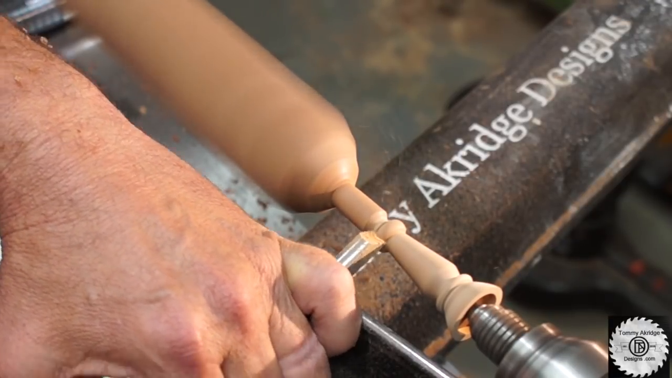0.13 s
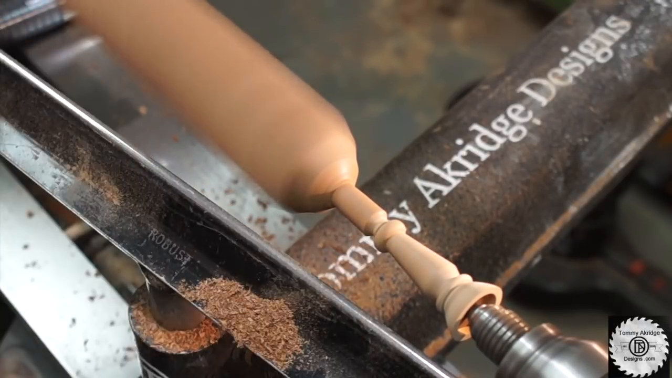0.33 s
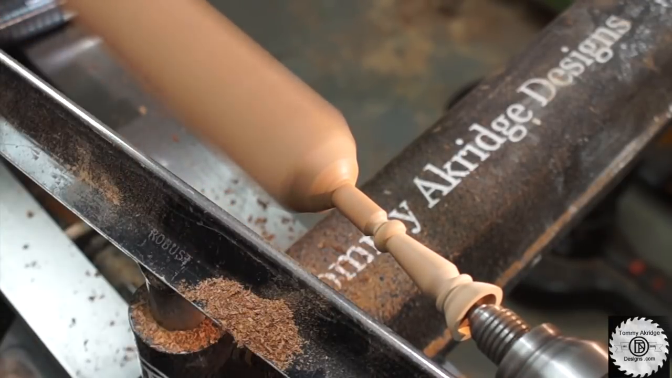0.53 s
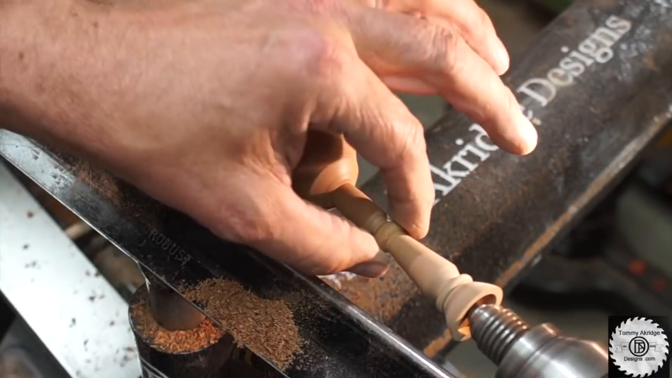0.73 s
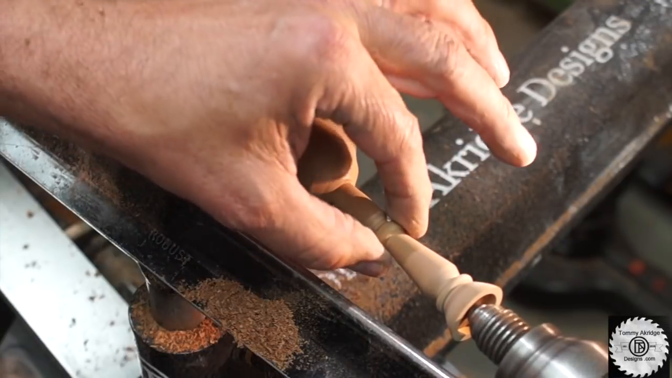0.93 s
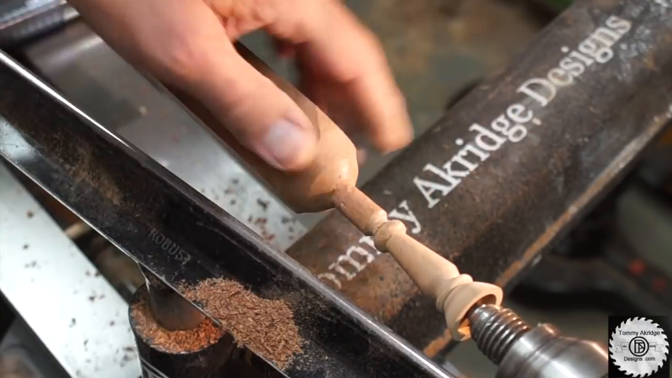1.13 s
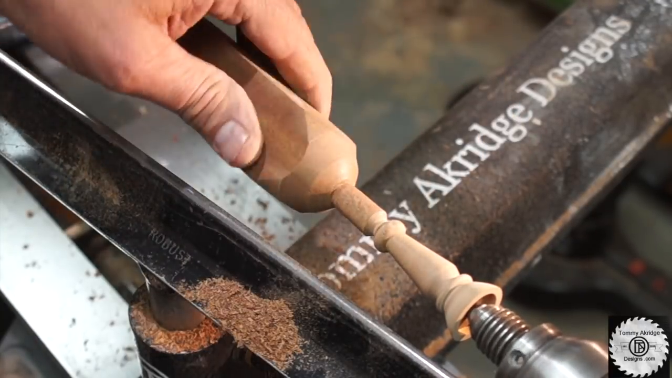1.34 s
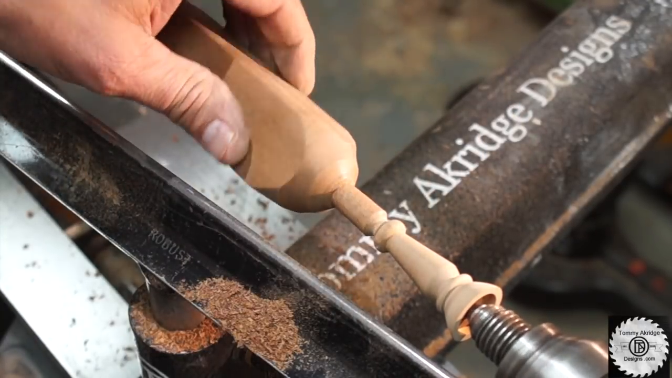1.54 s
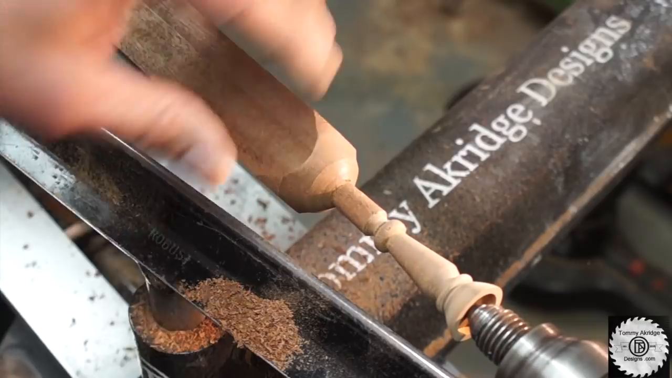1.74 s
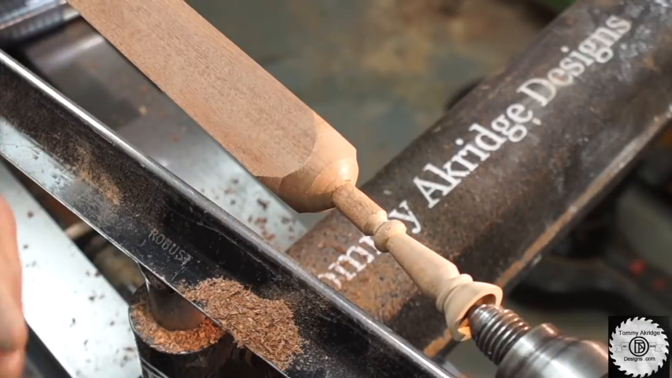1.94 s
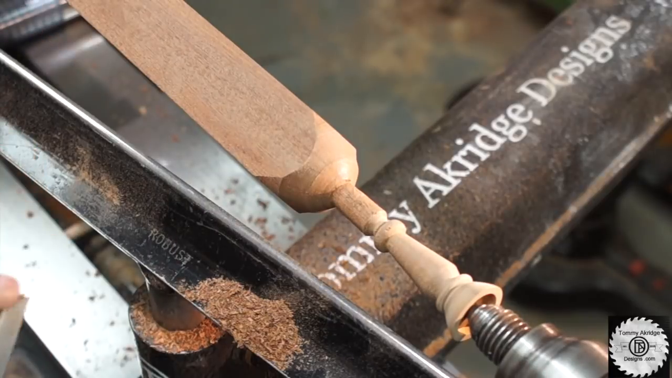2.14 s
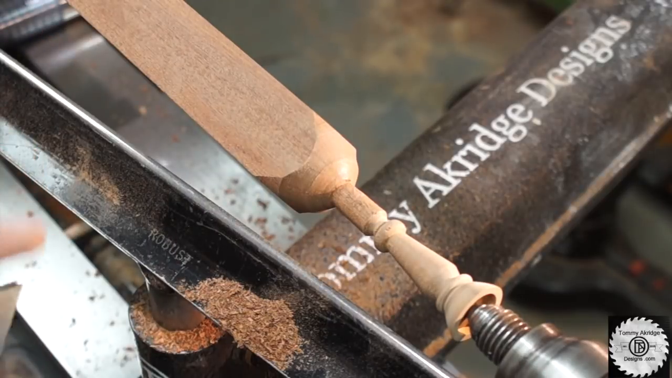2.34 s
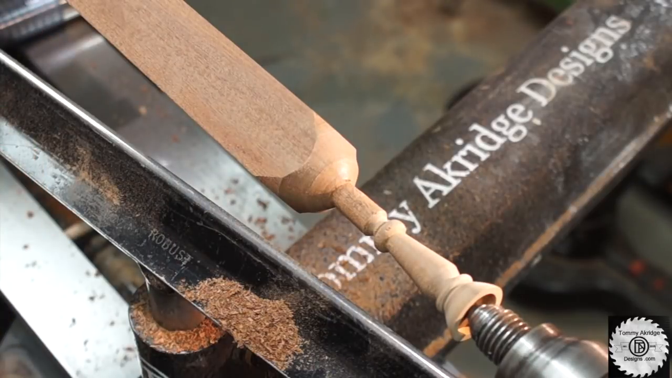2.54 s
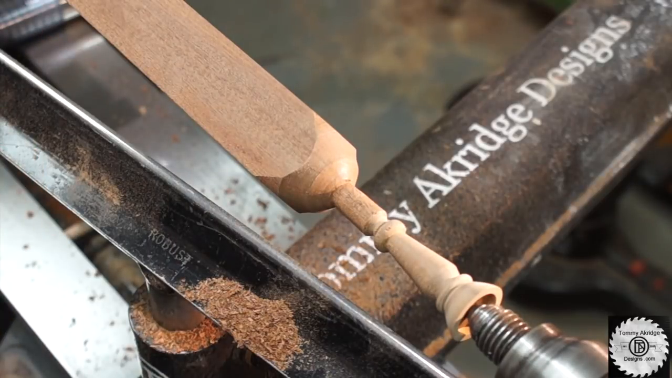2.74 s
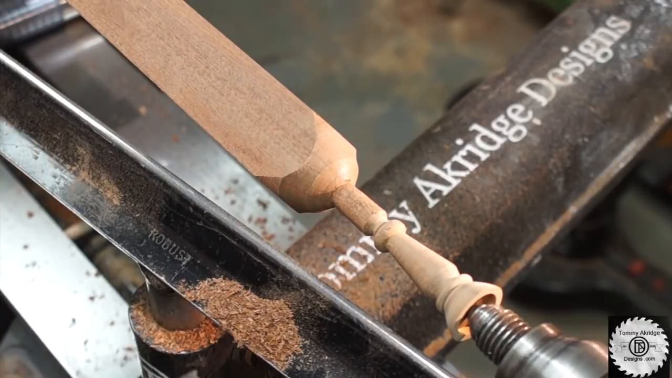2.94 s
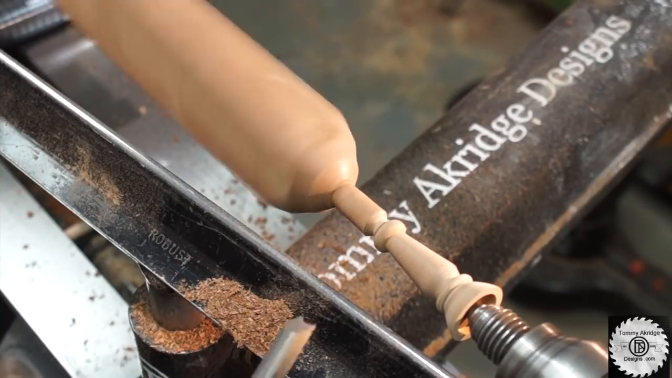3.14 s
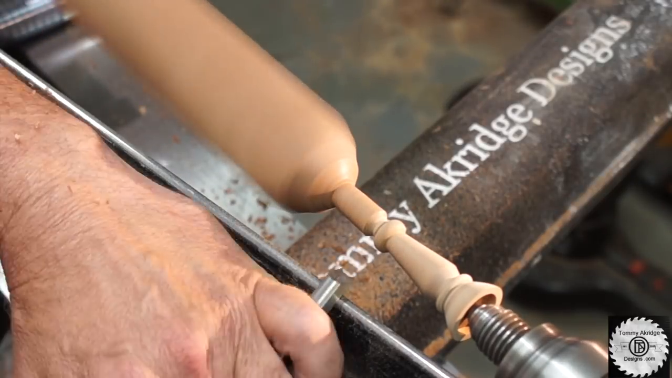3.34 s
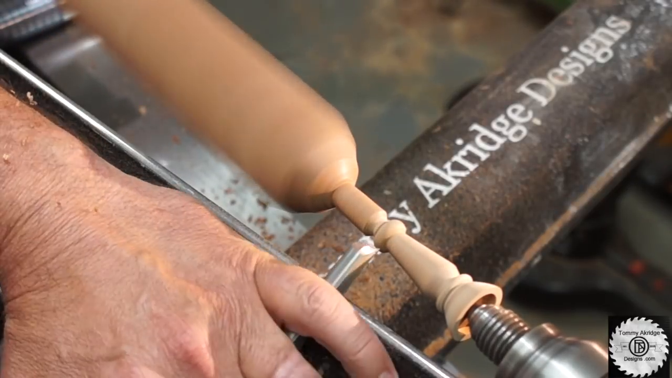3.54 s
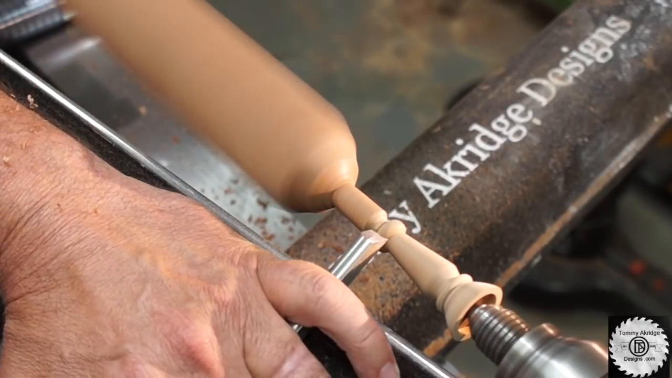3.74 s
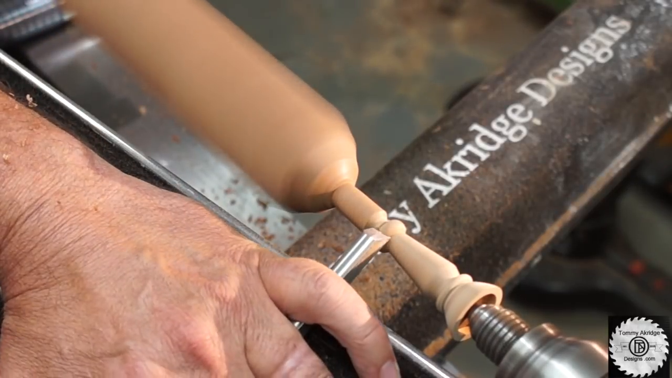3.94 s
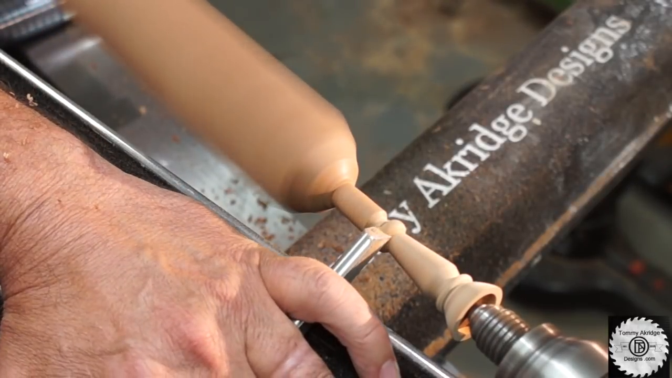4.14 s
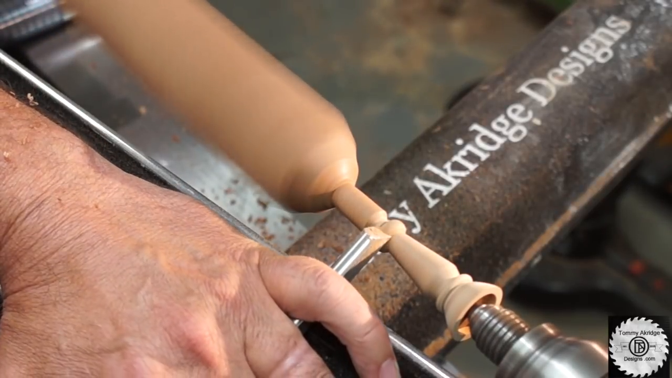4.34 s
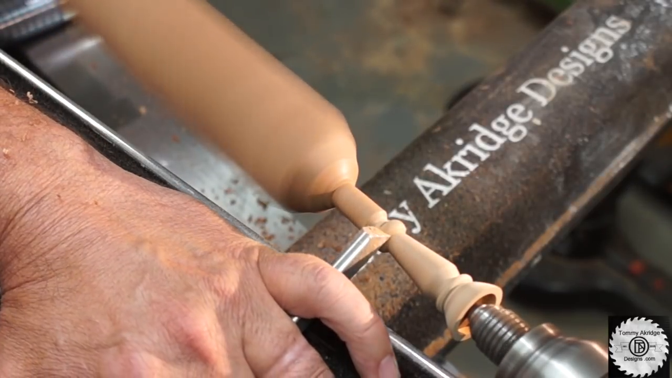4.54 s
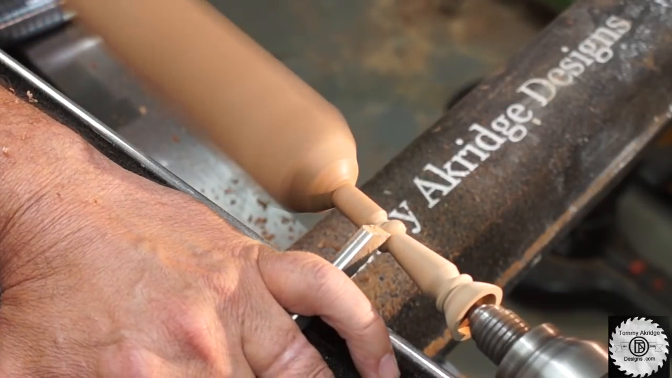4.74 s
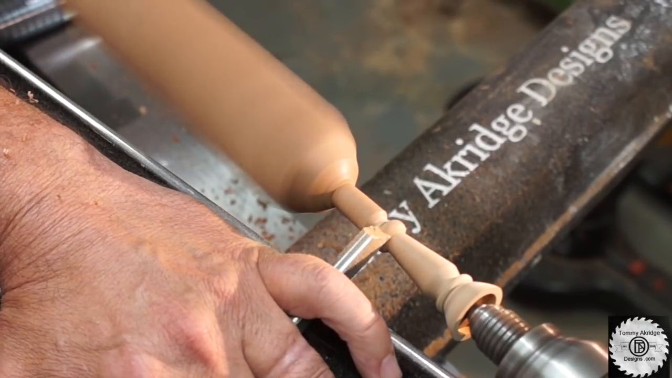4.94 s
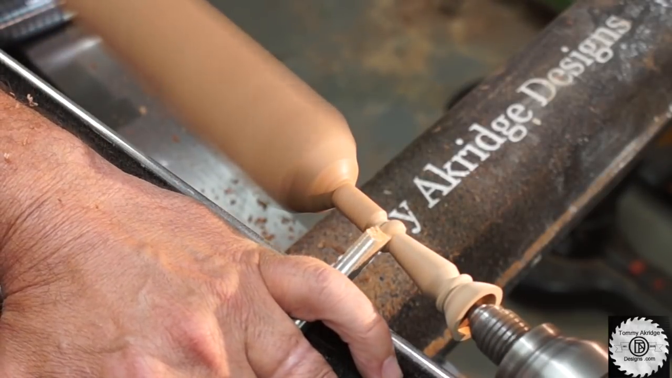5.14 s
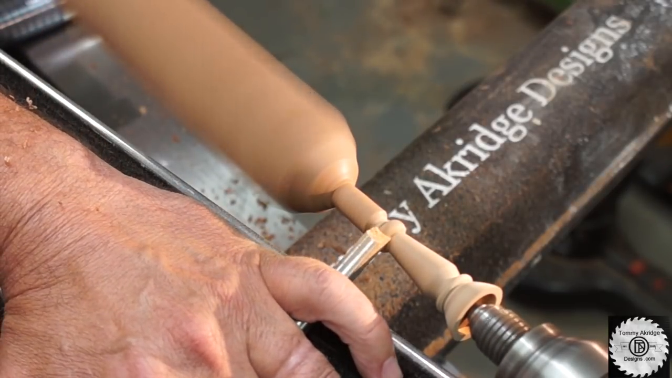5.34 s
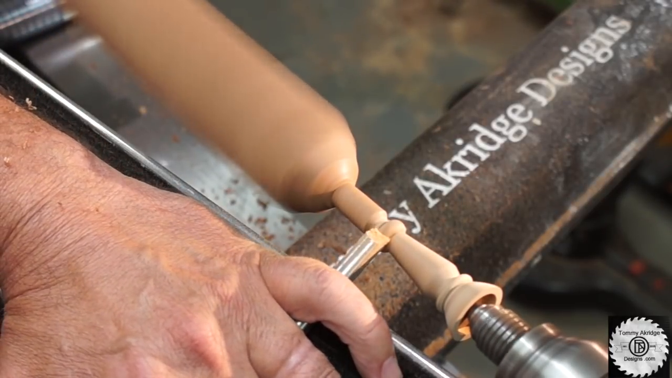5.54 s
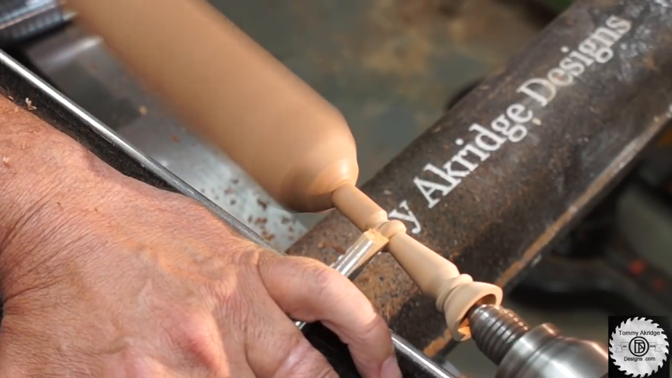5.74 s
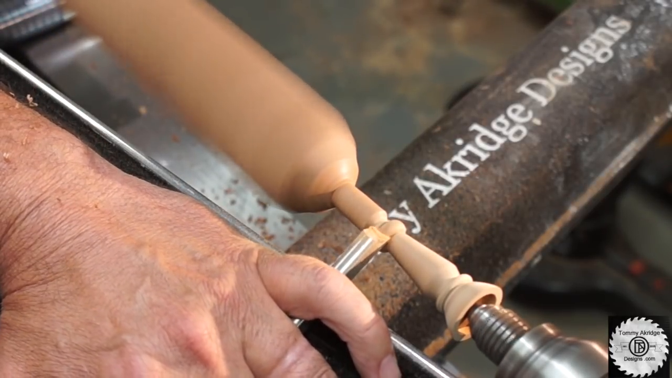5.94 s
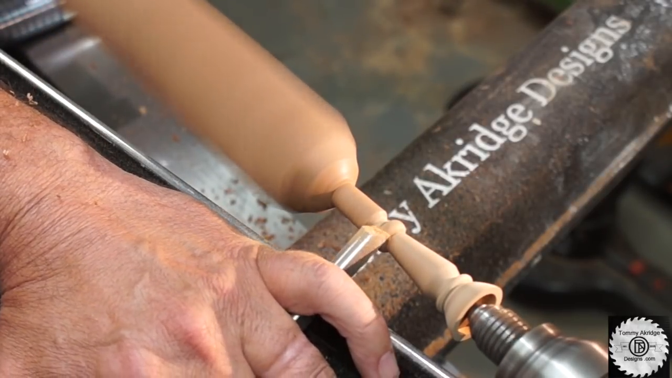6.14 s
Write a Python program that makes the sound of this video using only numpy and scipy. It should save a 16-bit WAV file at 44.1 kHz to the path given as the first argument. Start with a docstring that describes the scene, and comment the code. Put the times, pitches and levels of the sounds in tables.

```python
"""Small wood lathe, close up

A gouge finishes a cut, the spindle brakes to rest while the drive and its fan whine on, then it spins
up again; the gouge clacks onto the tool rest and cuts once more. Tones locked to the rotation make the
motor and bearings; coloured noise that partly repeats as the same marks come by makes the wood chatter
and the steel scrape; brighter noise makes the shavings hiss, and tones at multiples of the rate of the
marks make the cut sing."""
import sys
import numpy as np
from scipy import signal
from scipy.fft import rfft, irfft
from scipy.io import wavfile
from scipy.ndimage import uniform_filter1d, map_coordinates

SR = 44100
rng = np.random.default_rng(int(sys.argv[2]) if len(sys.argv) > 2 else 0)


def store_pcm(level_fs):
    """Save levels as 16-bit WAV."""
    pcm = np.round(np.clip(level_fs, -1, 1) * 32767).astype(np.int16)
    wavfile.write(sys.argv[1], SR, np.atleast_2d(pcm).T)


N = 272538
T = np.arange(N) / SR
FREQS = np.maximum(np.fft.rfftfreq(N, 1 / SR), 1)  # Hz, kept above zero for the logarithm

# Table levels are relative: each source trims its own mix.
# spindle speed (time [s], share of full speed [1])
SPINDLE_SPEED = [(0, 1), (.455, 1), (.565, .825), (.63, .77), (1.12, 0), (3.13, 0), (3.665, .82), (3.76, 1),
                 (6.2, 1)]
# tones of the drive and its fan (frequency [Hz], level [dB], relative flutter [dB])
DRIVE_TONES = [(69.6, -81, -3), (235, -68, 2.5), (364, -57, 0), (479.7, -43, 1.24), (707, -62, 3.5),
               (938.5, -56.5, 5.5), (961.6, -56, 5.5), (1172, -59, 3), (1902, -48, 1.5), (2017, -56, 7),
               (2240, -62.5, 10.5), (2334, -59, 2.5), (4980, -62, 5), (5150, -60, -0.5), (5391, -72, 4),
               (5610, -59.5, -0.5), (5890, -61, -1.5), (6080, -63.5, -5)]
# slow swell of those tones, heard relative to its median (time [s], level [dB])
DRIVE_SWELL = [(0.0, -48.5), (0.08, -46), (1.05, -42.5), (3.67, -42), (5.51, -43), (5.78, -47), (6.18, -46)]
# rush of the fan (frequency [Hz], level [dB])
FAN_SPECTRUM = [(30, -34), (70, -22.5), (200, -18), (310, -11), (420, -1.5), (550, -13), (800, -10.5),
                (1250, 4), (1600, 1), (2200, 2), (2700, -3.5), (5500, -6.5), (9000, -13), (16000, -17.5)]
# its resonances (frequency [Hz], width [Hz], height above the spectrum [dB])
FAN_RESONANCES = [(602, 26, 17), (724, 60, 14), (970, 13, 4), (1884, 83, 4.5), (3350, 550, 5.5),
                  (10230, 460, 8.5)]
# motor tones (frequency at full speed [Hz], level [dB])
MOTOR_TONES = [(126, -48), (1233, -52), (1459, -51), (1497, -48.5), (1943, -51.5), (2430, -52.5)]
# motor housing (frequency [Hz], level [dB])
HOUSING_SPECTRUM = [(60, -55), (130, -24.5), (700, -27), (1000, -17), (1300, -3), (2000, 0), (2500, -2)]
# its resonances (frequency [Hz], width [Hz], height above the spectrum [dB])
HOUSING_RESONANCES = [(1202, 40, 14), (1492, 98, 9), (2050, 130, 0)]
# bearing tones after the headstock (frequency at full speed [Hz], level [dB])
BEARING_TONES = [(3058, -46), (3402, -48.5), (3860, -55), (4199, -46.5), (4339, -50), (4613, -46),
                 (4705, -48), (5087, -46), (5389, -43), (5640, -48.5), (5879, -47), (6360, -51),
                 (6830, -46), (7337, -47), (7580, -61), (7822, -47), (8306, -47.5), (8796, -48),
                 (9280, -49)]
# headstock (frequency [Hz], level [dB])
HEADSTOCK_SPECTRUM = [(40, -32), (130, -29), (250, -17), (500, -5), (900, -8.5), (1300, -2), (2100, 3),
                      (2600, 3), (3600, 1), (6000, -0.5), (8600, -2), (9600, -3.5), (16000, -8)]
# its resonances (frequency [Hz], width [Hz], height above the spectrum [dB])
HEADSTOCK_RESONANCES = [(1257, 57, 12.9), (1484, 67, 15.8), (1880, 280, 3.9), (3174, 106, 6.3),
                        (3770, 180, 6), (5330, 110, 7.1), (7670, 260, 7.1), (8230, 130, 5.6),
                        (11700, 270, 6.6), (14200, 400, 4.5)]
# small handling knocks (time [s], level [dB], decay by 60 dB [s], centre [Hz], width [Hz])
HANDLING_KNOCKS = [(1.124, -34.5, 0.08, 2150, 300), (1.127, -43, 0.072, 4800, 4000),
                   (3.1112, -19, 0.006, 11500, 11000), (3.11, -35.5, 0.099, 4520, 700),
                   (3.112, -33.5, 0.093, 7700, 2500), (3.444, -34, .05, 9000, 12000)]
# the gouge lands and bounces on the rest (time [s], level [dB])
REST_BOUNCES = [(3.3242, -22), (3.332, -24.5), (3.339, -26), (3.347, -36)]
# gouge against rest (frequency [Hz], level [dB])
CLACK_SPECTRUM = [(600, -34), (1300, 4.5), (3000, -13), (4200, -19), (5000, -0.5), (9500, 0.5), (13400, -1),
                  (15000, -10)]
# its resonances (frequency [Hz], width [Hz], height above the spectrum [dB])
CLACK_RESONANCES = [(1290, 96, 8.5), (1490, 120, 6.6), (4880, 150, 12), (5800, 110, 7.3), (6900, 120, 7),
                    (8450, 150, 4.6), (9400, 400, 9.1), (12630, 130, 18), (13100, 200, 7)]
# chattering workpiece (frequency [Hz], level [dB])
WOOD_SPECTRUM = [(30, -28), (150, -26), (300, -25.5), (550, -15), (750, -7), (1050, -11.5), (1300, -2),
                 (2100, 1.5), (2450, -3), (2850, 0.5), (3400, -10), (6000, -36)]
# its resonances (frequency [Hz], width [Hz], height above the spectrum [dB])
WOOD_RESONANCES = [(780, 45, 9.7), (1246, 69, 5.2), (1480, 87, 9.3), (1702, 42, 6.5), (2074, 100, 6.8),
                   (2800, 130, 4.7)]
# scraping steel (frequency [Hz], level [dB])
STEEL_SPECTRUM = [(1500, -50), (3000, -8.5), (3900, 4), (4700, -0.5), (6200, 3), (8000, 3.5), (9500, -4),
                  (12000, -2.5)]
# its resonances (frequency [Hz], width [Hz], height above the spectrum [dB])
STEEL_RESONANCES = [(4664, 88, 14), (4920, 160, 10), (5400, 27, 1.3), (7110, 80, 6.7), (8500, 85, 5.6)]
# hissing shavings (frequency [Hz], level [dB])
SHAVING_SPECTRUM = [(5000, -39), (9000, -4), (10800, 3.5), (12200, 1), (13500, 7), (15000, 6), (16000, -25)]
# their resonances (frequency [Hz], width [Hz], height above the spectrum [dB])
SHAVING_RESONANCES = [(11420, 66, 8.4), (11900, 50, 5.8), (12100, 160, 8.8), (12600, 63, 6.5),
                      (13400, 51, 6), (13100, 60, 5.4), (14330, 50, 4.5), (14730, 82, 7)]
# buzz of ripples on the cut surface (frequency [Hz], level relative to the chatter setting [dB])
RIPPLE_TONES = [(600, -24.5), (700, -20), (800, -12.5), (900, -20), (1000, -20.5), (1500, -17), (1600, -18),
                (1700, -16), (1800, -13), (2100, -17), (2200, -18), (2600, -13), (4500, -21), (4600, -16),
                (4700, -14), (4900, -20), (5000, -14)]
# passes of the gouge (start [s], end [s], chatter [dB], scrape [dB], shaving hiss [dB], wood note [Hz],
# its level [dB], steel note [Hz], its level [dB], shaving whistle [Hz])
GOUGE_PASSES = [(-0.05, 0.132, -32, -28, -20.5, 1000, -40, 5000, -33, 12050),
                (0.138, 0.218, -28, -24, -22.5, 900, -38, 4600, -34, 12300),
                (3.919, 3.94, -36, -33, -32.5, 1500, -43, 4700, -37, 11850),
                (4.108, 4.18, -30, -29, -23, 2200, -35, 4600, -40, 11850),
                (4.24, 4.352, -28, -26, -23, 1500, -34, 4600, -38, 12050),
                (4.531, 4.935, -30, -28.5, -26, 2200, -34, 5000, -52, 12200),
                (4.938, 5.112, -30.5, -27, -23, 1500, -32, 5000, -47, 11850),
                (5.148, 5.343, -33, -28, -24.5, 1600, -47, 5000, -46, 11850),
                (5.38, 5.615, -36.5, -27.5, -25, 1500, -59, 4600, -35, 11850),
                (5.63, 5.813, -38.5, -27, -20, 1000, -42.5, 4600, -41, 14600),
                (5.784, 6.25, -32.5, -26.5, -23.5, 1700, -42, 4600, -38, 11800)]
# the edge digs in and chatters (start [s], end [s], chatter [dB], low note [Hz], high note [Hz])
EDGE_DIGS = [(-0.02, 0.031, -23.5, 1700, 2100), (0.141, 0.22, -21.5, 1500, 4600),
             (4.111, 4.176, -20, 1500, 2200), (4.306, 4.359, -20.5, 1500, 2000),
             (4.84, 4.857, -25.5, 1500, 2200), (4.94, 4.984, -20.5, 1500, 2200),
             (5.019, 5.059, -22, 1500, 2200), (5.187, 5.231, -26.5, 1500, 2100),
             (5.276, 5.348, -17, 1300, 2000), (5.512, 5.554, -17.5, 1500, 4600),
             (5.765, 5.837, -24, 1500, 4600), (6.138, 6.2, -23, 1500, 1700)]
# stereo side relative to mid (frequency [Hz], level [dB])
SIDE_SPECTRUM = [(40, -17), (130, -3.5), (400, -29), (700, -15.5), (1400, -16.5), (2800, -9), (5600, -5.5),
                 (9500, -7), (11800, -5), (16000, -19)]

MARK_HZ = 100.1  # times a second the same marks come by at full speed
TOP_HZ = 15900  # upper edge of the treble
# running noise before and after the stop (dB at full speed); it grows as a power of the speed
FIRST_RUN_DB, SECOND_RUN_DB, RUMBLE_POWER = -34, -30.5, 0.98
STRAIN_DB = 3  # motor boost while speed changes by one full speed per second
PASS_ATTACK_S, PASS_RELEASE_S = 0.02, 0.02
DIG_ATTACK_S, DIG_RELEASE_S, DIG_GROWTH_DB_PER_S = 0.0055, 0.01, 48
# scrape and the two notes of a dig, relative to its chatter setting
DIG_SCRAPE_DB, LOW_NOTE_DB, HIGH_NOTE_DB = -9, -9, -10
# chatter at which the wood half tears; cut in hiss when fully torn; share of a clean cut that repeats
TEAR_DB, TORN_HISS_DB, CLEAN_REPEAT = -28, -3, 0.75
WHISTLE_WIDTH_HZ, WHISTLE_DB = 260, -7  # shaving whistle; level relative to the hiss setting


def undb(db):
    """Decibels to amplitude."""
    return 10 ** (np.asarray(db) / 20)


def unit(x):
    """Scale a sound to an RMS of one."""
    return x / np.sqrt(np.mean(x ** 2))


def curve(table):
    """A two-column table as a line through time."""
    seconds, values = np.transpose(table)
    return np.interp(T, seconds, values)


def noise():
    """White noise for the whole scene."""
    return rng.standard_normal(N)


def walk(rate):
    """Smooth random drift with a spread near 1, taking about `rate` new values per second."""
    step = max(int(SR / rate), 1)
    held_values = np.repeat(rng.standard_normal(N // step + 1), step)
    return 1.33 * uniform_filter1d(held_values, step)[:N]


def response(spectrum, peaks):
    """A broad spectrum with resonances standing on it."""
    hz, db = np.transpose(spectrum)
    lift = sum((undb(d) - 1) / (1 + 2j * (FREQS - f) / w) for f, w, d in peaks)
    return undb(np.interp(np.log(FREQS), np.log(hz), db)) * (1 + lift)


def colour(x, spectrum, peaks=()):
    """Filter a sound through a spectrum and its resonances."""
    return irfft(rfft(x) * response(spectrum, peaks), N)


def burst(start, t60):
    """Noise that starts at once and dies away by 60 dB in t60 seconds."""
    decay = np.exp(-np.log(1000) * np.maximum(T - start, 0) / t60)
    return noise() * (T >= start) * decay


def surface(marks, memory):
    """Roughness passing a fixed point; each pass of the marks keeps a share of the one before."""
    size = int(SR / MARK_HZ)
    rows = rng.standard_normal((int(marks[-1]) + 2, size))
    # run the rows twice so that the first one heard already has a past
    track = signal.lfilter([1], [1, -memory], np.vstack([rows, rows]), axis=0)[len(rows):]
    return unit(map_coordinates(track.ravel(), [marks * size], order=3))


def orders(table, marks, flutter_db, wander):
    """Unsteady tones locked to the rotation, one row each."""
    tones = []
    for hz, db in table:
        level = np.sqrt(2) * undb(db + flutter_db * walk(35))
        phase = 2 * np.pi * (hz / MARK_HZ * marks + rng.random()) + wander * walk(30)
        tones.append(level * np.sin(phase))
    return np.array(tones)


def rumble(speed):
    """Strength of the running noise: it rises with the speed and is louder in the second run."""
    stopped_s = T[np.argmin(speed)]
    run_db = np.where(T < stopped_s, FIRST_RUN_DB, SECOND_RUN_DB)
    return undb(run_db) * np.maximum(speed, 0) ** RUMBLE_POWER


def drive(fan_db=-43.0, swell_db=0.5):
    """The drive's tones flutter over the rush of its fan, whether the spindle turns or not."""
    tones = 0
    for hz, db, flutter_db in DRIVE_TONES:
        phase = 2 * np.pi * (hz * T + rng.random()) + 0.17 * flutter_db * walk(22)
        level = np.sqrt(2) * undb(db + 0.45 * flutter_db * walk(25))
        tones = tones + level * np.sin(phase)
    level_db = curve(DRIVE_SWELL)
    tones = tones * undb(level_db - np.median(level_db))
    fan = unit(colour(noise(), FAN_SPECTRUM, FAN_RESONANCES))
    return tones + fan * undb(fan_db + swell_db * walk(8.6))


def motor(marks, speed, whine_db=30):
    """Tones glide with the speed, swell under strain and flare as they cross housing resonances."""
    strain = uniform_filter1d(abs(np.gradient(speed)) * SR, size=4000)
    tones = orders(MOTOR_TONES, marks, flutter_db=1.0, wander=0.45).sum(axis=0)
    housed = colour(tones, HOUSING_SPECTRUM, HOUSING_RESONANCES)
    return housed * rumble(speed) * undb(whine_db + STRAIN_DB * strain)


def spindle(marks, speed, tones_db=29, races_db=-1.74, steepness=0.6):
    """Balls roll over rough races; their tones glide through the headstock and fade as it slows."""
    body = abs(response(HEADSTOCK_SPECTRUM, HEADSTOCK_RESONANCES))
    # the force behind each tone is its full-speed level less the headstock's gain there
    forces = [(hz, db - 20 * np.log10(np.interp(hz, FREQS, body))) for hz, db in BEARING_TONES]
    tones = orders(forces, marks, flutter_db=3, wander=0.6).sum(axis=0) * speed ** steepness
    races = surface(marks, memory=0.65) + 1.25 * noise()
    tones = colour(tones, HEADSTOCK_SPECTRUM, HEADSTOCK_RESONANCES)
    races = colour(races, HEADSTOCK_SPECTRUM, HEADSTOCK_RESONANCES)
    return rumble(speed) * (undb(tones_db) * tones + undb(races_db) * unit(races))


def handling(clack_db=-2):
    """Short noise bursts: knocks around the stop and restart, then the gouge set on the steel rest."""
    knocks = 0
    for start, db, t60, hz, width in HANDLING_KNOCKS:
        band = 1 / (1 + 1j * (FREQS ** 2 - hz ** 2) / (FREQS * width))
        band = band / np.sqrt(np.mean(abs(band) ** 2))
        knocks = knocks + undb(db) * irfft(rfft(burst(start, t60)) * band, N)
    bounces = sum(undb(db) * burst(start, t60=0.081) for start, db in REST_BOUNCES)
    return knocks + undb(clack_db) * colour(bounces, CLACK_SPECTRUM, CLACK_RESONANCES)


def held(start, end, attack_s, release_s):
    """Attack, hold and release; two that abut keep their power steady."""
    rise = 1 + np.tanh((T - start) / attack_s)
    fall = 1 + np.tanh((end - T) / release_s)
    return np.sqrt(rise * fall) / 2


def contact(start, end):
    """The edge meets the wood, stays and lifts off."""
    return held(start, end, PASS_ATTACK_S, PASS_RELEASE_S)


def dig(start, end):
    """Chatter feeds on its own marks and grows until the edge comes free."""
    growth = undb(DIG_GROWTH_DB_PER_S * (np.clip(T, start, end) - end))
    return held(start, end, DIG_ATTACK_S, DIG_RELEASE_S) * growth


def together(shapes, levels_db):
    """Envelopes at their levels, summed by power."""
    return np.sqrt(undb(levels_db) ** 2 @ shapes ** 2)


def restless(force, spectrum, peaks, shift_db):
    """A body whose resonances come and go as the point of contact moves."""
    plain = colour(force, spectrum)
    rings = sum(undb(shift_db * walk(45)) * (colour(force, spectrum, [peak]) - plain) for peak in peaks)
    return unit(plain + rings)


def whistling(force, passes):
    """A curling shaving whistles up the flute: each pass rings in one narrow band of its own."""
    spectrum, out = rfft(force), 0
    for shape, (_, _, _, _, hiss_db, *_, hz) in zip(passes, GOUGE_PASSES):
        band = 1 / (1 + 1j * (FREQS - hz) / WHISTLE_WIDTH_HZ) ** 2
        out = out + shape * undb(hiss_db + WHISTLE_DB) * unit(irfft(spectrum * band, N))
    return out


def squeal(marks, torn, hz, strength, wander=0.16, tearing=0.8, flutter_db=0.4):
    """The edge locks onto a whole number of waves per pass of the marks; tearing breaks up the tone."""
    now = np.flatnonzero(strength > strength.max() / 100)  # skip where it is 40 dB down
    waves = round(hz / MARK_HZ) * marks[now]
    phase = 2 * np.pi * (waves + rng.random()) + wander * walk(39)[now]
    phase = phase + tearing * torn[now] * walk(130)[now]
    out = np.zeros(N)
    out[now] = np.sqrt(2) * strength[now] * undb(flutter_db * walk(40)[now]) * np.sin(phase)
    return out


def singing(marks, torn, passes, digs, patchy_db=2.0):
    """Ripples buzz with the weight of the cut; each pass and each dig brings out two notes of its own."""
    ripples = [(round(hz / MARK_HZ) * MARK_HZ, db) for hz, db in RIPPLE_TONES]
    tones = orders(ripples, marks, flutter_db=2.0, wander=0.31)
    buzz = sum(tone * undb(patchy_db * walk(7)) for tone in tones)
    out = buzz * together(passes, [row[2] for row in GOUGE_PASSES])
    for shape, (*_, wood_hz, wood_db, steel_hz, steel_db, _) in zip(passes, GOUGE_PASSES):
        out += squeal(marks, torn, wood_hz, shape * undb(wood_db))
        out += squeal(marks, torn, steel_hz, shape * undb(steel_db))
    for shape, (*_, db, low_hz, high_hz) in zip(digs, EDGE_DIGS):
        out += squeal(marks, torn, low_hz, shape * undb(db + LOW_NOTE_DB))
        out += squeal(marks, torn, high_hz, shape * undb(db + HIGH_NOTE_DB))
    return out


def gouge(marks, grain_db=0.9, throb=0.017, wood_db=-4.0, steel_db=-1.7, shavings_db=-1.2):
    """The edge retraces earlier marks and tears fresh fibres; wood, steel and shavings sound."""
    passes = np.array([contact(*row[:2]) for row in GOUGE_PASSES])
    digs = np.array([dig(*row[:2]) for row in EDGE_DIGS])
    _, _, chatter_db, scrape_db, hiss_db, *_ = np.transpose(GOUGE_PASSES)
    digging = together(digs, [row[2] for row in EDGE_DIGS])
    torn = digging / (digging + undb(TEAR_DB))
    repeat = CLEAN_REPEAT * (1 - torn) ** 2
    # the edge bites harder once per pass of the marks, and unevenly as the fibres give way
    bite = (1 + throb * np.cos(2 * np.pi * marks)) * undb(grain_db * walk(350))
    fresh = np.sqrt(1 - repeat) * noise()
    retraced = np.sqrt(repeat) * 0.74 * surface(marks, memory=0.906)
    force = bite * (fresh + retraced)
    chatter = restless(force, WOOD_SPECTRUM, WOOD_RESONANCES, shift_db=3.5)
    chatter = chatter * np.hypot(together(passes, chatter_db), digging)
    scrape = restless(force, STEEL_SPECTRUM, STEEL_RESONANCES, shift_db=4.0)
    scrape = scrape * np.hypot(together(passes, scrape_db), digging * undb(DIG_SCRAPE_DB))
    snaps = bite * (noise() + 0.66 * surface(marks, memory=0.8))
    hiss = restless(snaps, SHAVING_SPECTRUM, SHAVING_RESONANCES, shift_db=0.5)
    hiss = hiss * together(passes, hiss_db) + whistling(snaps, passes)
    hiss = hiss * undb(TORN_HISS_DB * torn)  # shavings thin out when the wood tears
    cut = undb(wood_db) * chatter + undb(steel_db) * scrape + undb(shavings_db) * hiss
    return cut + singing(marks, torn, passes, digs)


def scene(left_db=0.32, bench_t60=0.067, room_db=-14.0):
    """All sources ring briefly in the workshop; shifting reflections from bed, hands and bench widen them."""
    speed = curve(SPINDLE_SPEED)
    marks = np.cumsum(speed) * MARK_HZ / SR  # how often the marks have come by so far
    mid = drive() + motor(marks, speed) + spindle(marks, speed) + handling() + gouge(marks)
    tail = burst(0, t60=0.13)
    mid = mid + undb(room_db) * signal.fftconvolve(mid, tail / np.linalg.norm(tail))[:N]
    side = 0
    for path in range(2):
        reflections = rfft(burst(0, bench_t60))
        # only the phase of the reflections is kept, so the tone of the mid survives
        scattered = irfft(rfft(mid) * reflections / abs(reflections), N)
        side = side + walk(25) * scattered / np.sqrt(2)
    side = colour(side, SIDE_SPECTRUM)
    return np.array([(mid + side) * undb(left_db), (mid - side) * undb(-left_db)])


def record(dry):
    """A steep low-pass cuts the top of the treble."""
    lowpass = signal.ellip(10, 0.2, 80, TOP_HZ, fs=SR, output="sos")
    return signal.sosfilt(lowpass, dry)


dry = scene()
out = record(dry)
store_pcm(out)
```